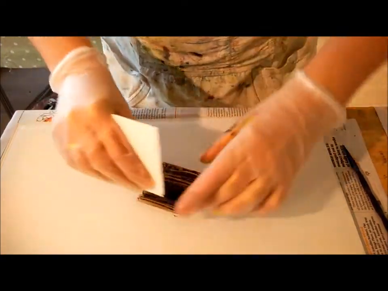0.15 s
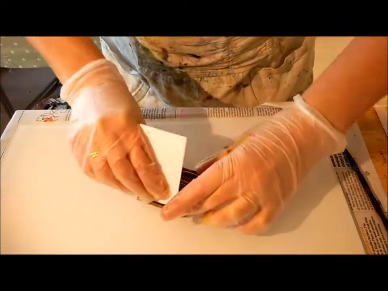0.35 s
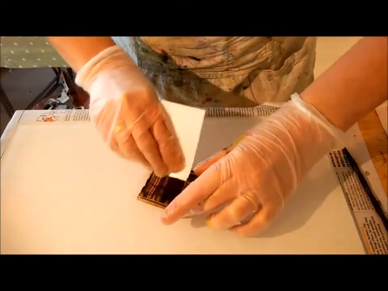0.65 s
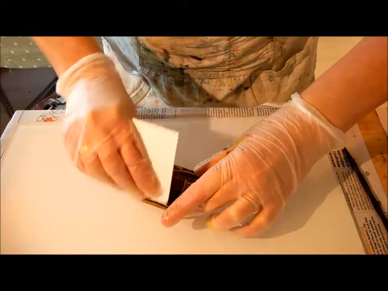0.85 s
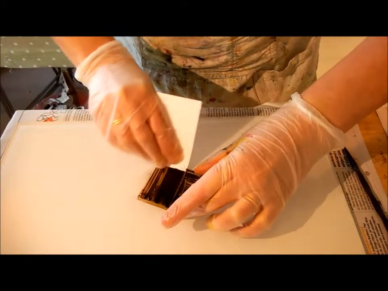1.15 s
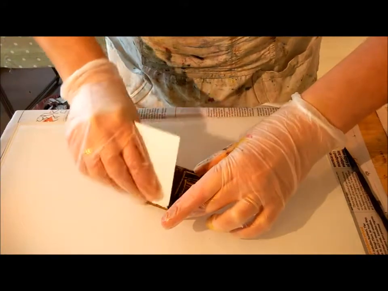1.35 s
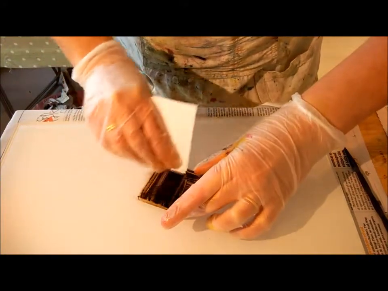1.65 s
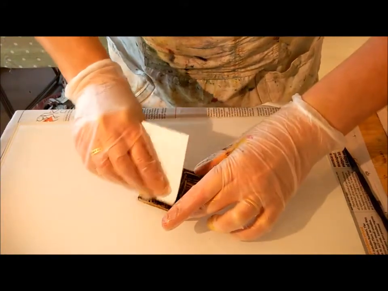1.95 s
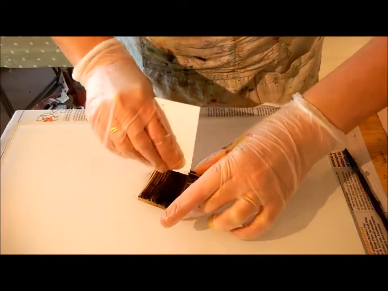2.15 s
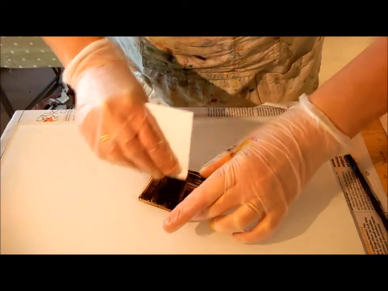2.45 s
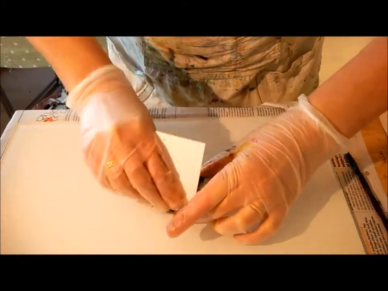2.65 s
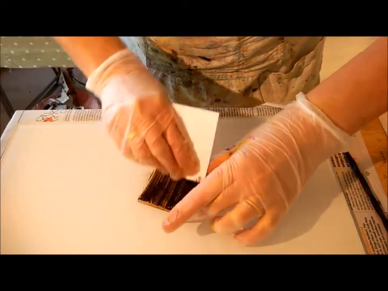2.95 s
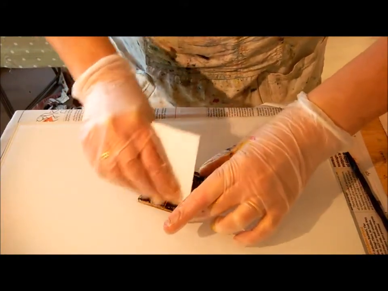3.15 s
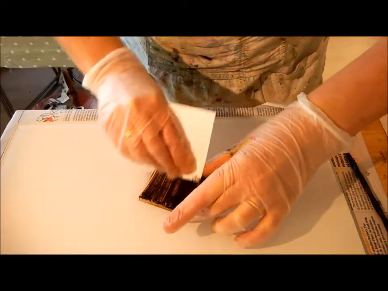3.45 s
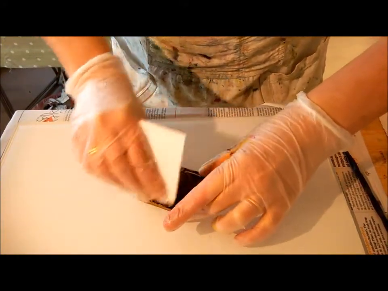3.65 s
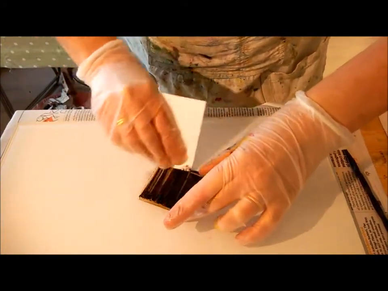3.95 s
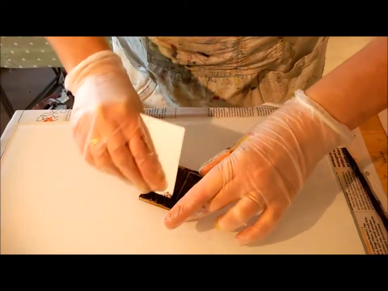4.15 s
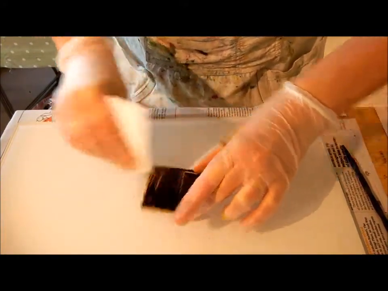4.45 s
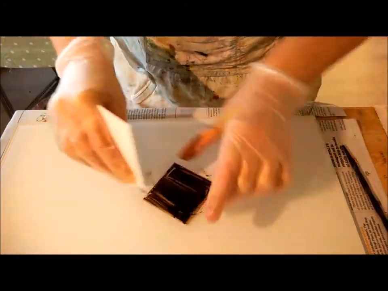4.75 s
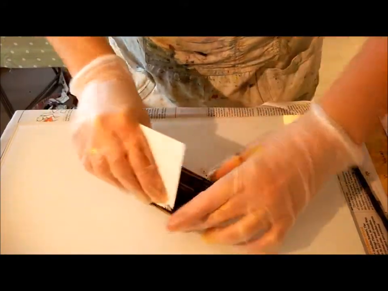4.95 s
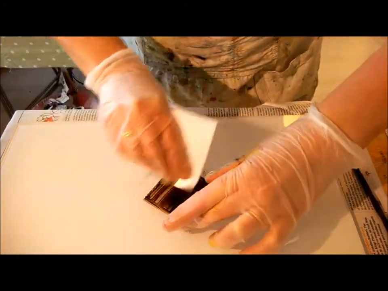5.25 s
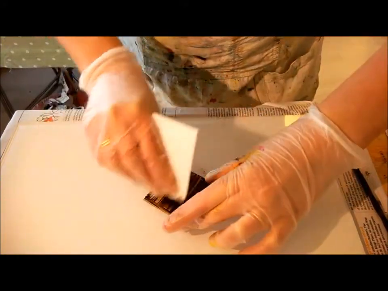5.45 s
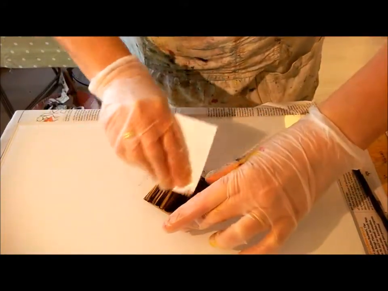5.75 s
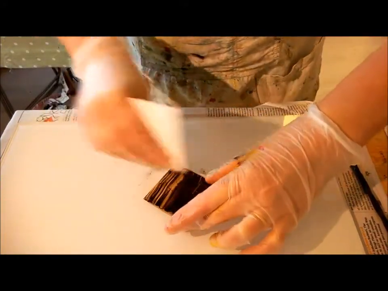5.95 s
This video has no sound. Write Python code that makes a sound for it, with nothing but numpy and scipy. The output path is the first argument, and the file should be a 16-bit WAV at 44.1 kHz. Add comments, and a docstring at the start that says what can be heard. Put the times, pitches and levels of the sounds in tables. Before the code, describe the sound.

A low, soft rumble and faint hiss of a quiet room run throughout. At 0.1 s a small plate slides on the table with a bright, grainy swish; a stiff card lands with a double knock at 0.35 s and a sharp ink tick at 0.5 s. The strongest hollow scrape comes around 0.6 s. Further short, stuttering strokes peak near 1.1, 1.6, 2.1, 2.95, 3.45, 3.9 and 4.35 s, each gritty and papery, with uneven catches and light taps between; a hard crack with a brief table boom stands out at 1.29 s. Around 2.4-2.7 s there is a pause. At 4.5-4.8 s the plate is turned with two soft swishes. Lighter scraping returns at 5.3 s, another loud crack at 5.46 s, a tap at 5.64 s, then weak, scratchy rubbing and sticky ticks until 6.1 s. Close, dry stereo, left side duller.

```python
"""In a quiet, humming studio a stiff card is set down on a small inked plate and dragged over its scratched lines.
Strokes are stick-slip friction noise ringing in the card's bending and twisting modes; landings are short pulses
that excite plate modes, a crack and a decaying table boom. Tacky ink ticks, and between strokes the plate slides
on the table as a grainy swish. Two close microphone ports, the left one duller, are widened by subtracting from
each a delayed, filtered copy of the other."""
import sys
import numpy as np
from scipy import signal
from scipy.fft import rfft, irfft, next_fast_len
from scipy.io import wavfile
from scipy.ndimage import map_coordinates

SR = 44100
rng = np.random.default_rng(int(sys.argv[2]) if len(sys.argv) > 2 else 0)


def invert_db(level):
    """Linear amplitude ratio for a level in decibels (20 dB per decade), elementwise."""
    return 10 ** (np.asarray(level, dtype=float) / 20)


def unload_audio(sound):
    """Save the sound as a 16-bit wav file, at the path given as the first command line argument."""
    columns = np.transpose(np.atleast_2d(sound))
    # keep every value between -1 and 1, then stretch to whole-number steps
    steps = np.round(np.clip(columns, -1, 1) * 32767)
    wavfile.write(sys.argv[1], SR, steps.astype(np.int16))


N = 269447

# Studio rumble: (t/s, level/dB); its spectrum: (f/Hz, relative level per Hz/dB)
RUMBLE_LEVEL = [(0.0, -63.5), (1.4, -60), (2.2, -62), (3.7, -58.5), (4.87, -63), (6.11, -62.5)]
RUMBLE_SPECTRUM = [(20, -19), (45, 5), (68, -1), (95, -4), (122, -5.5), (165, -6), (200, -2.5), (300, -34),
                   (500, -57)]
# Hum strands in the rumble: (f/Hz, level over the rumble/dB, width/Hz)
HUM_STRANDS = [(70.3, -2.5, 5.8), (118, -8.5, 7.8), (167.5, -7.5, 9.4)]
# Steady studio hiss: (f/Hz, relative level per Hz/dB)
STUDIO_SPECTRUM = [(60, -19), (150, -3), (250, -2), (400, -5), (800, -10), (1500, -15.5), (3000, -16),
                   (8000, -18), (14000, -19.5), (15000, -20), (15550, -21), (15800, -44), (16300, -80)]
# Narrow hisses at the right port: (f/Hz, level/dB, width/Hz)
NARROW_HISSES = [(7360, -94, 39), (7700, -85, 95), (11380, -70.5, 67), (11600, -71, 60), (15200, -82, 70)]
# Thin whines at the right port: (f/Hz, peak level/dB)
WHINE_TONES = [(10061, -80), (11402, -76), (11999, -79), (15181, -82)]

# The plate slides on the table: (t at full speed/s, push before it/s, held/s, stop/s, level/dB)
PLATE_SLIDES = [(0.078, 0.047, 0.019, 0.02, -43), (0.452, .012, .004, 0.018, -50.5),
                (4.576, 0.087, 0.086, .055, -52), (4.79, 0.011, 0.046, 0.012, -47.5)]
# Sliding swish: (f/Hz, relative level per Hz/dB)
SLIDE_SPECTRUM = [(300, -10), (2000, -17.5), (4000, -5.5), (7000, -6.5), (9700, 3), (12000, -3),
                  (15400, -14), (16200, -32)]

# Bright ticks: tacky ink letting go, and the snap or rattle at a light landing (0.323 s, 0.5 s): (t/s, starting
# level/dB); their spectrum: (f/Hz, relative level per Hz/dB)
BRIGHT_TICKS = [(0.323, -43), (0.5, -29.5), (0.7941, -41), (1.2465, -38.5), (1.704, -46.5), (2.888, -41.5),
                (3.075, -47), (3.0924, -50), (3.582, -47.5), (4.0362, -43), (4.411, -43), (4.757, -48),
                (5.4196, -42.5), (5.822, -43), (5.8284, -42), (5.848, -35.5), (5.9549, -41.5), (6.079, -44),
                (6.097, -44.5)]
TICK_SPECTRUM = [(2000, -7.5), (5000, -2.5), (10000, 11.5), (16000, 1)]

# The card lands: (t/s, blow level/dB, contact width/ms, crack level/dB, plate drive level/dB)
LANDINGS = [(0.3267, -22.5, 0.43, -46, -23), (0.3637, -21.5, 0.084, -29, -26),
            (0.5016, -41, 0.3, -43, -65.5), (0.961, -20.5, 0.096, -30, -22),
            (1.2886, -8.5, 0.06, -19, -22.5), (1.2923, -38, 0.082, -33, -53),
            (1.4319, -18.5, 0.073, -33.5, -25), (1.9065, -17.5, 0.12, -31.5, -20),
            (2.7259, -22, 0.11, -40.5, -26.5), (3.1435, -21.5, 0.16, -66, -26),
            (3.1508, -27, 0.08, -63, -31.5), (3.2845, -18.5, 0.08, -42, -28), (3.636, -35, 0.17, -53, -51),
            (3.7573, -13.5, 0.1, -64, -24.5), (4.231, -23.5, 0.095, -31, -28), (5.037, -32, 0.14, -53, -58),
            (5.4616, -7.5, 0.074, -18, -21), (5.64, -23, 0.14, -32.5, -20)]
# Modes of the plate on the table: (f/Hz, width/Hz, level/dB)
PLATE_MODES = [(260, 43, -20), (575, 24, -8.5), (845, 28, -20.5), (1019, 28, -4), (1234, 56, -11),
               (1840, 127, -8)]
# Landing crack: (f/Hz, relative level per Hz/dB)
CRACK_SPECTRUM = [(1500, -33), (3000, 4), (6000, -3.5), (10000, 0), (13000, -9), (16000, -19), (17000, -48)]
# Table boom: (f/Hz, relative level per Hz/dB); its decay by 60 dB: (f/Hz, T60/s)
TABLE_SPECTRUM = [(100, -28), (200, -10), (270, 0), (360, -7.5), (520, 0.5), (800, -6.5), (1500, -17),
                  (3000, -15), (8000, -18), (16000, -28)]
TABLE_DECAY = [(200, 0.18), (530, 0.19), (1400, 0.2), (3700, 0.019), (12000, 0.031)]

# Strokes of the card: (t of release/s, held before it/s, tail/s, card level/dB, edge level/dB)
CARD_STROKES = [(0.65, 0.032, 0.087, -36.5, -44), (0.827, .005, 0.074, -58.5, -63),
                (1.129, 0.014, 0.12, -41, -37.5), (1.605, 0.016, 0.098, -42, -37),
                (2.088, 0.022, 0.082, -43.5, -38.5), (2.716, 0.025, 0.017, -67, -55),
                (2.961, 0.019, 0.12, -42, -37.5), (3.475, .03, 0.094, -42.5, -38),
                (3.925, 0.024, 0.11, -44, -37), (4.316, 0.002, 0.13, -44.5, -43),
                (5.036, 0.0048, 0.0083, -55.5, -47.5), (5.341, 0.051, 0.15, -53.5, -48),
                (5.983, 0.21, 0.03, -56.5, -59), (6.1, .005, 0.022, -68, -60.5)]
# The edge or a corner catches hard: (t/s, card level/dB, rasp level/dB)
HARD_CATCHES = [(0.607, -32, -41.5), (0.6428, -33, -64), (1.071, -41.5, -49), (1.1073, -48, -40),
                (1.123, -39, -41), (1.155, -67, -52), (1.184, -57, -41), (1.211, -34, -38.5),
                (1.2786, -33.5, -49), (1.5436, -46, -56), (1.562, -44.5, -46), (1.5842, -34, -44),
                (1.5962, -41, -38), (1.663, -46, -42), (2.022, -52, -54), (2.061, -49, -36),
                (2.141, -52, -50), (2.2378, -65, -58), (2.33, -59.5, -72), (2.8893, -70, -43.5),
                (2.9253, -34.5, -58), (2.961, -42, -38.5), (3.07, -55, -74), (3.438, -35.5, -40),
                (3.468, -42, -41), (3.4986, -59, -58), (3.8975, -41, -41), (3.9507, -41.5, -52),
                (3.9817, -53, -42.5), (4.008, -41.5, -59), (4.35, -55, -47), (4.3748, -53, -41.5),
                (4.3923, -38.5, -36), (5.266, -55, -60), (5.31, -50, -48), (5.3602, -53, -41.5),
                (5.408, -40.5, -57), (5.453, -36, -57), (5.7915, -47, -49), (5.8474, -59, -59),
                (5.877, -47, -46), (5.9105, -58, -55), (5.929, -49, -65), (5.976, -52, -51)]
# Modes in which the card bends and twists: (f/Hz, width/Hz, relative level/dB)
BENDING_MODES = [(524.5, 120, -0.5), (724, 105, 2), (866, 102, -3)]
TWISTING_MODES = [(1032, 65, -2.5), (1303, 126, 6), (1937, 52, -4.5)]
# Rasp of the edge and hiss of the ink: (f/Hz, relative level per Hz/dB)
RASP_SPECTRUM = [(1200, -24.5), (2000, -1), (3300, -1), (4500, -6.5), (6000, -34), (9000, -38)]
INK_HISS_SPECTRUM = [(3000, -50), (4500, 4.5), (6000, 2.5), (9000, 4.5), (12000, -0.5), (15400, -17),
                     (16200, -35)]

# Room decay by 60 dB: (f/Hz, T60/s); room gain: (f/Hz, level/dB)
ROOM_DECAY = [(200, 0.23), (2000, 0.32), (10000, 0.24)]
ROOM_GAIN = [(200, -8), (1500, -12.5), (4000, -17.5), (12000, -16)]
# Gain of the left port, and of the crossed copy that is subtracted: (f/Hz, level/dB)
LEFT_PORT_GAIN = [(60, 2), (300, 2), (1000, 0), (4000, -6), (8000, -7.5), (12000, -15), (16000, -15)]
CROSS_GAIN = [(60, -59), (400, -5.5), (1200, -6), (2500, -4.5), (5000, -10.5), (9000, -14.5), (12000, -15),
              (16000, -8)]

SLIDE_EDGE_DB = -6  # where a slide starts and ends
TICK_T60_MS = 16
# Table boom: base level, growth per dB of blow (slower than the blow), gain from a longer, softer contact
TABLE_DB, TABLE_FOLLOWS, SOFT_BOOM_DB_PER_MS = -32.5, 0.55, 8.5
PRESS_S, PRESS_SHARE = 0.029, 0.47  # a press lasts this long plus a share of the tail
LET_GO_S = 0.017  # the edge springs free
# Stroke level under its top/dB: (first touch, fully pressed, sprung free, end of tail)
CARD_SHAPE, EDGE_SHAPE = (-26.5, -6, -12.5, -25.5), (-40.5, -6, -8, -32.5)
LINES_PER_S, LINE_DB, LINE_SPREAD_DB = 57, -8, 6  # lesser lines: mean rate, size over the rubbing, +/- spread
CATCH_MS, CATCH_BEND_DB, CATCH_HISS_DB = 6.4, -9, -7  # fall time; bending over twisting; hiss over rasp
CATCH_GRIT_DB = 2  # a catch is one slip, steadier than the rubbing
TWIST_DB = -0.5  # twisting over bending
HISS_DB, HISS_FOLLOWS = -9, 0.83  # the ink hiss grows more slowly than the rasp
CROSS_DELAY_S, TOP_HZ = 0.000426, 16600


def unit(x):
    """Normalization: scaled to rms 1."""
    return x / np.sqrt(np.mean(x ** 2) + 1e-20)


def along(points, hz):
    """Interpolation of (f/Hz, value) points on a logarithmic frequency axis."""
    f, v = np.transpose(points)
    return np.interp(np.log(hz + 1), np.log(f + 1), v)


def filtered(x, response):
    """Linear filtering: the spectrum of x times a complex response of frequency."""
    m = 2 * next_fast_len(x.shape[-1] // 2 + 4096)
    spectrum = rfft(x, m) * response(np.fft.rfftfreq(m, 1 / SR))
    return irfft(spectrum, m)[..., :x.shape[-1]]


def coloured(x, spectrum):
    """Minimum phase: a causal filter from a smooth spectrum, keeping the rms of white noise."""
    def response(hz):
        cepstrum = irfft(np.log(unit(invert_db(along(spectrum, hz)))))
        half = len(cepstrum) // 2
        # folding the cepstrum onto positive time makes the filter causal
        cepstrum[1:half] *= 2
        cepstrum[half + 1:] = 0
        return np.exp(rfft(cepstrum))[:len(hz)]
    return filtered(x, response)


def resonances(modes):
    """Modal superposition: causal band-pass responses, one row a mode, with alternating signs."""
    def response(hz):
        rows = []
        for k, (centre, width, db) in enumerate(modes):
            damping = 1j * hz * width
            rows.append((-1) ** k * invert_db(db) * damping / (centre ** 2 - hz ** 2 + damping))
        return np.array(rows)
    return response


def through(x, modes):
    """Resonance: x ringing in summed modes, keeping the rms of white noise."""
    def response(hz):
        total = resonances(modes)(hz).sum(0)
        return total / np.sqrt(np.mean(np.abs(total) ** 2))
    return filtered(x, response)


def lumps(grain_ms):
    """Random modulation: a smooth curve with a new value every grain."""
    grains = np.arange(N) / (grain_ms * SR / 1000)
    return map_coordinates(rng.standard_normal(N // 4), [grains])


def ports(length, alike):
    """Partial coherence: noise at two ports, of which the power share `alike` is common to both."""
    shared, *own = rng.standard_normal((3, length))
    return np.sqrt(alike) * shared + np.sqrt(1 - alike) * np.array(own)


def grit(size_db, alike):
    """Friction noise: partly coherent noise whose size varies from grain to grain."""
    return unit(invert_db(size_db) * ports(N, alike))


def narrow(hz, width_hz):
    """Band limitation: noise under a narrow Gaussian passband, at rms 1."""
    return unit(filtered(rng.standard_normal(N), lambda f: np.exp(-.5 * ((f - hz) / width_hz) ** 2)))


def tail(t60s, seconds):
    """Reverberant decay: a pair of noise tails, each frequency dying at its own rate."""
    noise = rng.standard_normal((2, round(seconds * SR)))
    hz, t, z = signal.stft(noise, SR, nperseg=256)
    decay = invert_db(-60 * t / along(t60s, hz)[:, None])
    return signal.istft(z * decay, SR, nperseg=256)[1]


def add(x, s, sound):
    """Superposition: mix a short sound in at time s."""
    part = x[..., round(s * SR):][..., :sound.shape[-1]]
    part += sound[..., :part.shape[-1]]


def swell(x, points):
    """Envelope: mix in a gain that follows (t/s, level/dB) points, with soft ends."""
    (first, _), (last, _) = points[0], points[-1]
    s, db = np.transpose([(first - .012, -110), *points, (last + .022, -110)])
    start = max(s[0], 0)
    add(x, start, invert_db(np.interp(np.arange(start, s[-1], 1 / SR), s, db)))


def studio():
    """Background noise: incoherent rumble, hum and hiss at both ports; whines and narrow hisses in the right."""
    t = np.arange(N) / SR
    s, rumble_db = np.transpose(RUMBLE_LEVEL)
    hum = np.zeros((2, N))
    for hz, db, width_hz in HUM_STRANDS:
        hum += invert_db(db) * np.array([narrow(hz, width_hz), narrow(hz, width_hz)])
    rumble = hum + coloured(rng.standard_normal((2, N)), RUMBLE_SPECTRUM)
    hiss = invert_db(-58) * coloured(rng.standard_normal((2, N)), STUDIO_SPECTRUM)
    out = invert_db(np.interp(t, s, rumble_db)) * rumble + hiss
    for hz, db, width_hz in NARROW_HISSES:
        out[1] += invert_db(db) * narrow(hz, width_hz)
    for hz, db in WHINE_TONES:
        wander = .8 * lumps(grain_ms=60)  # slightly unsteady phase, rad
        out[1] += invert_db(db) * np.sin(2 * np.pi * hz * t + wander)
    return out


def sliding():
    """Sliding friction: a bright, slightly grainy swish that swells and stops with the plate."""
    speed = np.zeros(N)
    for s, push, held, stop, db in PLATE_SLIDES:
        edge_db = db + SLIDE_EDGE_DB
        swell(speed, [(s - push, edge_db), (s, db), (s + held, db), (s + held + stop, edge_db)])
    return coloured(speed * grit(1.56 * lumps(grain_ms=4.4), alike=0.17), SLIDE_SPECTRUM)


def ticks():
    """Sudden release: each tick, of tacky ink or at a light landing, is a few milliseconds of decaying bright
    noise."""
    out = np.zeros((2, N))
    t_ms = np.arange(SR // 25) / SR * 1000
    for s, db in BRIGHT_TICKS:
        add(out, s, invert_db(db - 60 * t_ms / TICK_T60_MS) * ports(len(t_ms), alike=0.16))
    return coloured(out, TICK_SPECTRUM)


def taps():
    """Impact excitation: a push with its bounce, a bright crack, the plate's modes and the table booming on."""
    push, plate = np.zeros(N), np.zeros((len(PLATE_MODES), N))
    crack, table = np.zeros((2, 2, N))
    t_ms = np.arange(-SR // 1000, SR // 40) / SR * 1000
    snap = invert_db(-60 * t_ms / 7) + 0.26 * invert_db(-60 * t_ms / 40)  # a sharp front and a short rattle
    for s, db, width_ms, crack_db, ring_db in LANDINGS:
        start = s - .001
        blow = np.exp(-.5 * (t_ms / width_ms) ** 2)
        bounce = np.exp(-.5 * ((t_ms - 1.624) / width_ms) ** 2)
        add(push, start, invert_db(db) * (blow + 0.62 * bounce))

        # each blow lands elsewhere, so the modes are driven unequally
        strengths = invert_db(ring_db + 2 * rng.standard_normal((len(PLATE_MODES), 1)))
        add(plate, start, strengths * blow / width_ms)

        add(crack, start, invert_db(crack_db) * snap * (t_ms > -.15) * ports(len(t_ms), alike=0.48))

        boom = tail(TABLE_DECAY, .3)
        boom_db = TABLE_DB + TABLE_FOLLOWS * db + SOFT_BOOM_DB_PER_MS * width_ms
        add(table, s + 0.000966, invert_db(boom_db) * (boom + 0.24 * boom[::-1]))

    def thin(hz):  # a small card radiates no bass
        return (1j * hz / (1j * hz + 400)) ** 2

    ringing = filtered(plate, resonances(PLATE_MODES)).sum(0)
    return filtered(push + ringing, thin) + coloured(crack, CRACK_SPECTRUM) + coloured(table, TABLE_SPECTRUM)


def scraping():
    """Stick-slip friction: rubbing noise and short, steadier bursts at hard catches share the card's modes."""
    card, edge = np.zeros((2, N))
    for s, held, tail_s, card_db, edge_db in CARD_STROKES:
        touch_s = s - held - PRESS_S - PRESS_SHARE * tail_s
        times = [touch_s, s - held, s, s + min(LET_GO_S, tail_s / 2), s + tail_s]
        for part, db, shape in (card, card_db, CARD_SHAPE), (edge, edge_db, EDGE_SHAPE):
            touch, pressed, free, end = shape
            swell(part, list(zip(times, db + np.array([touch, pressed, 0, free, end]))))

    t_ms = np.arange(SR // 25) / SR * 1000
    surge = (1 - np.exp(-t_ms / 0.19)) * np.exp(-(t_ms / CATCH_MS) ** 2)  # a quick bite, then release

    # lesser lines pass under the edge at random
    when, size = rng.random((2, N))
    lines = (when < LINES_PER_S / SR) * invert_db(LINE_DB + LINE_SPREAD_DB * 2 * (size - .5))
    bumps = 1 + signal.fftconvolve(lines, surge)[:N]
    bend = bumps * card
    twist = bumps * card * invert_db(TWIST_DB)
    rasp = bumps * edge
    hiss = bumps * edge ** HISS_FOLLOWS * invert_db(HISS_DB)

    # hard catches have noise of their own
    card_catch, edge_catch = np.zeros((2, N))
    for s, card_db, rasp_db in HARD_CATCHES:
        add(card_catch, s, invert_db(card_db) * surge)
        add(edge_catch, s, invert_db(rasp_db) * surge)
    card_catch = card_catch * grit(CATCH_GRIT_DB * lumps(grain_ms=1.5), alike=0.88)
    edge_catch = edge_catch * grit(CATCH_GRIT_DB * lumps(grain_ms=0.72), alike=0.47)

    slips = lumps(grain_ms=3.5)  # every slip shakes all parts of the rubbing at once
    bend = bend * grit(4.4 * slips, alike=0.86) + invert_db(CATCH_BEND_DB) * card_catch
    twist = twist * grit(3.7 * slips + 3.1 * lumps(grain_ms=1.5), alike=0.91) + card_catch
    rasp = rasp * grit(1.9 * slips + 3 * lumps(grain_ms=0.72), alike=0.64) + edge_catch
    hiss = hiss * grit(0.37 * slips + 3 * lumps(grain_ms=0.53), alike=0.19) + invert_db(CATCH_HISS_DB) * edge_catch
    modal = through(bend, BENDING_MODES) + through(twist, TWISTING_MODES)
    return modal + coloured(rasp, RASP_SPECTRUM) + coloured(hiss, INK_HISS_SPECTRUM)


def reverberation(work):
    """Reverberation: convolution with a delayed, decaying noise tail, then the room's gain."""
    room = tail(ROOM_DECAY, 0.33)
    room = np.pad(room / np.linalg.norm(room[0]), ((0, 0), (300, 0)))  # delayed by 300 samples
    wet = signal.fftconvolve(work, room, axes=1)[:, :N]
    return filtered(wet, lambda hz: invert_db(along(ROOM_GAIN, hz)))


def scene():
    """Superposition of the work on the plate, a little room sound, and the studio."""
    background = studio()
    work = sliding() + ticks() + taps() + scraping()
    return work + reverberation(work) + background


def top_cut(x):
    """Nothing passes above the cut-off."""
    return signal.sosfilt(signal.butter(12, 16790, fs=SR, output="sos"), x)


def record(dry):
    """Comb filtering: the left port is duller, and each side loses a delayed copy of the other."""
    left = filtered(dry[0], lambda hz: invert_db(along(LEFT_PORT_GAIN, hz)))
    heard = np.array([left, dry[1]])

    def crossing(hz):
        return invert_db(along(CROSS_GAIN, hz)) * np.exp(-2j * np.pi * hz * CROSS_DELAY_S)

    widened = heard - filtered(heard[::-1], crossing)
    mix = filtered(widened, lambda hz: 1 / (1 + (hz / TOP_HZ) ** 80))  # steep low-pass
    return top_cut(mix)


dry = scene()
out = record(dry)
unload_audio(out)
```